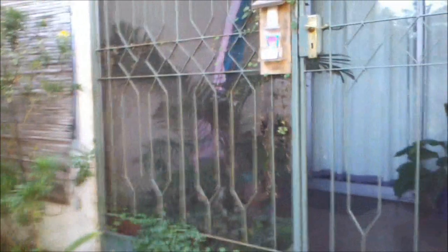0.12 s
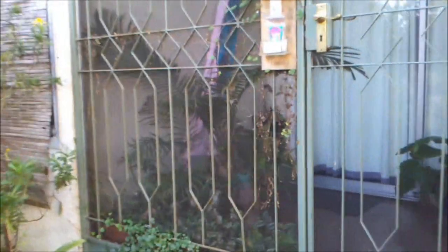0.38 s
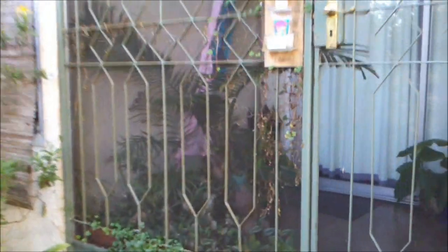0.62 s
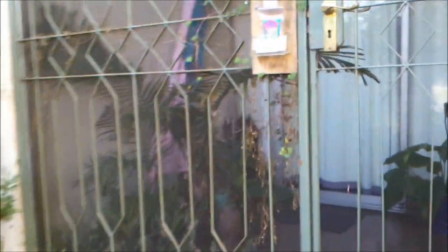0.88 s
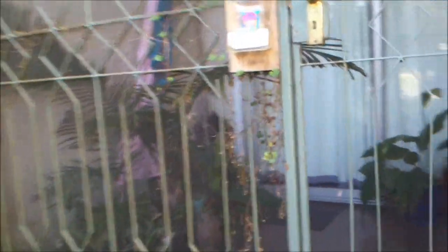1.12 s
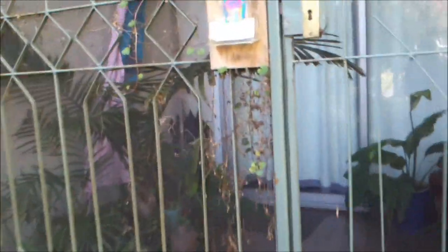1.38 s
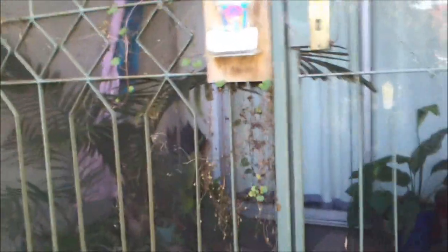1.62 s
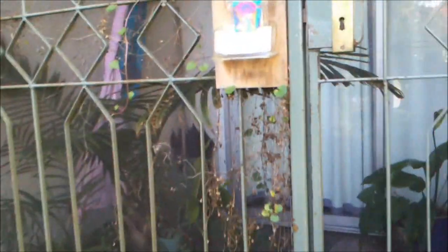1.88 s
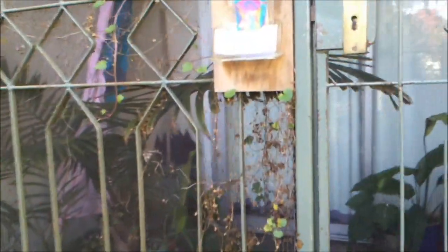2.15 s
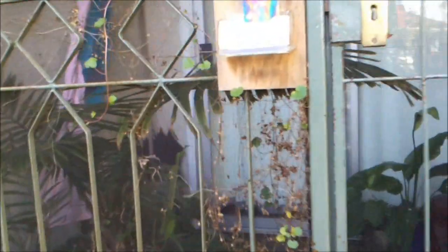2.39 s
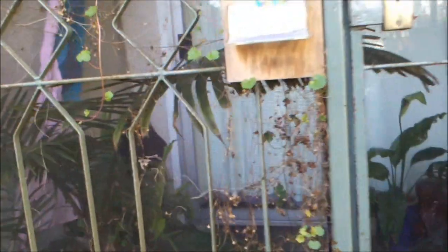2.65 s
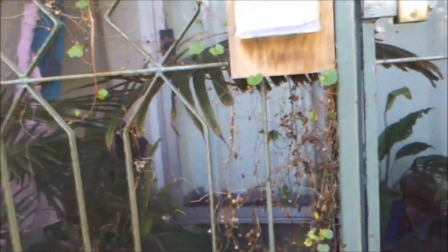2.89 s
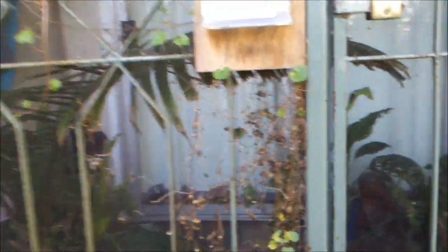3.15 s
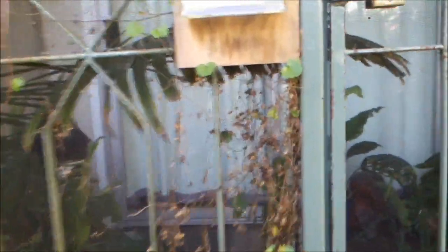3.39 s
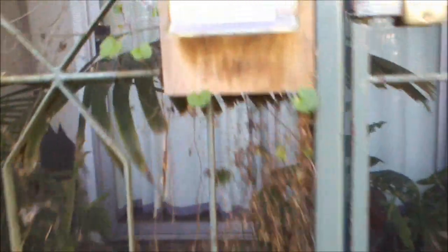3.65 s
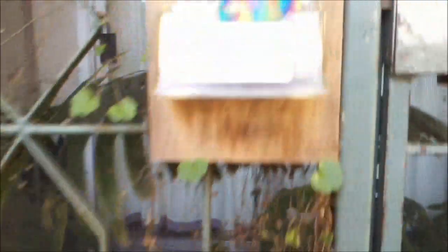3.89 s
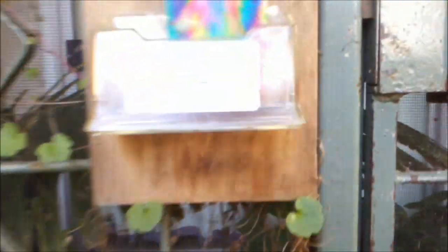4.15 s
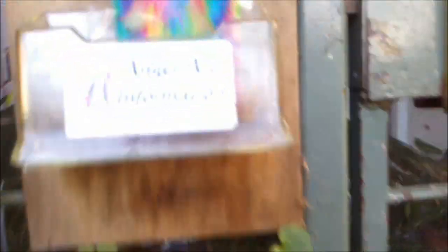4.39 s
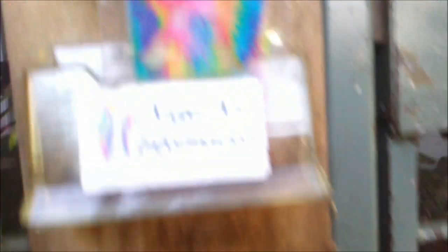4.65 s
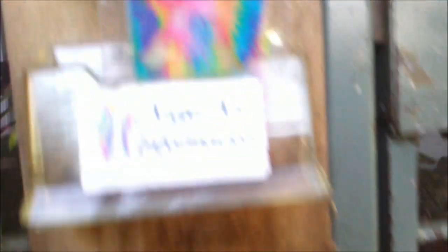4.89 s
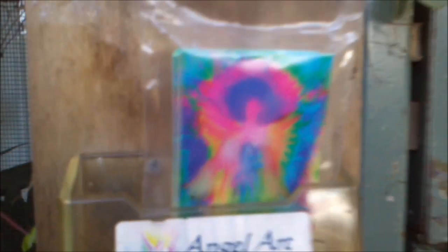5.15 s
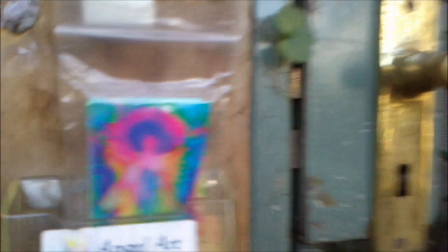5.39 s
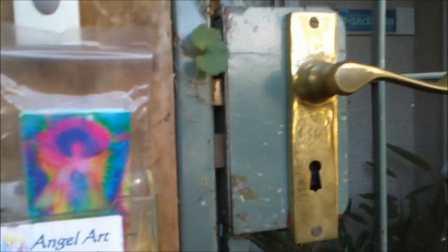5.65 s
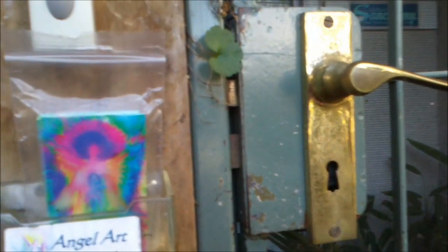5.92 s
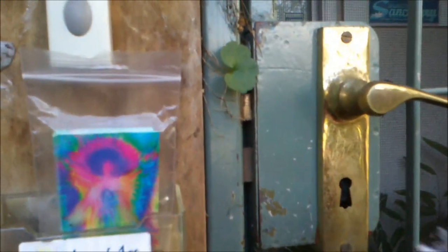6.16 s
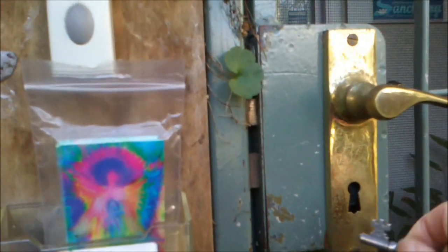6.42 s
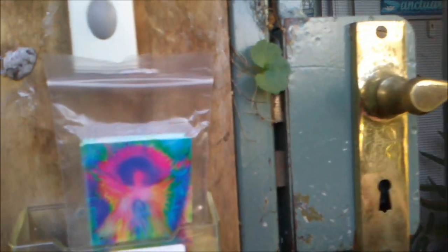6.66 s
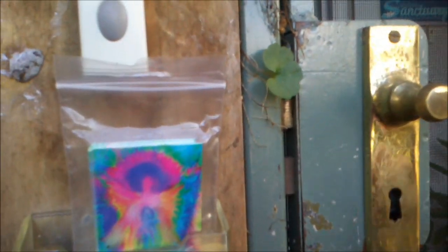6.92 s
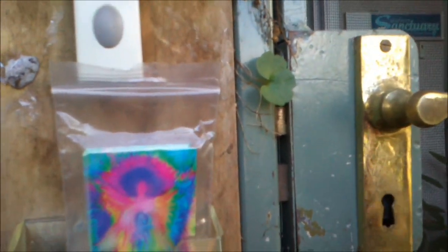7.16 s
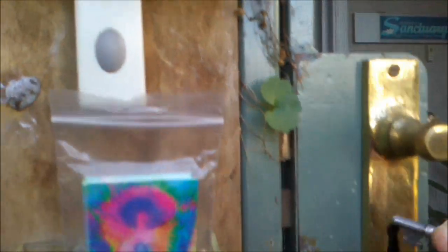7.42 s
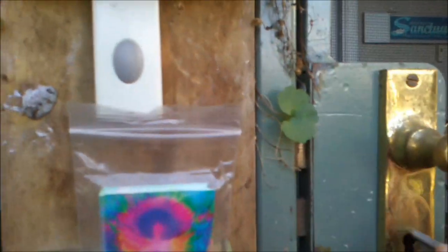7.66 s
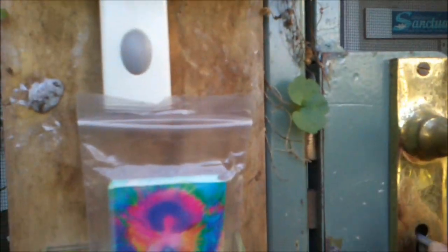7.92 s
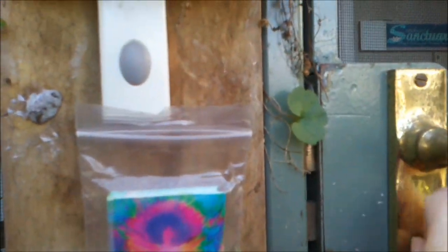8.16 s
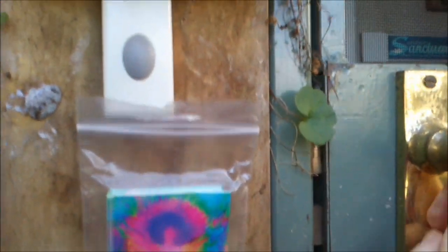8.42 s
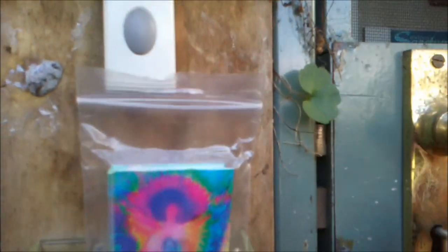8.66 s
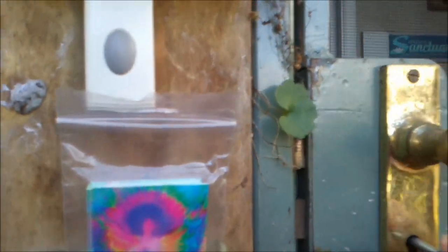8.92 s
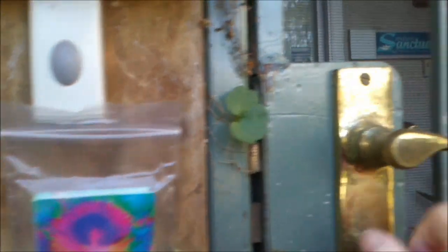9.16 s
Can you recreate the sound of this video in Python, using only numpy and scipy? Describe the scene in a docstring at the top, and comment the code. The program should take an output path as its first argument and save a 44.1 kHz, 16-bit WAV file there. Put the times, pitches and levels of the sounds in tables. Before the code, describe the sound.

Close, sharp metallic key jingles come in uneven bursts, thin out to small clicks, then a key knocks into a hollow lock, quiet street behind.

```python
"""Distant traffic hums from the start: filtered noise whose bands swell, under a sinusoidal engine note.
A bunch of keys swings and jangles in a hand walking up to a metal gate: chance impacts excite damped modes.
A far horn of steady partials sounds once, then a faint tone slides up, wavering, over a low hum.
At last the keys clink and turn in the lock, whose hollow case adds resonant noise until the key sits home.
Throughout, nearby walls return sparse echoes, and the loudest jangles overload a small recorder."""
import sys
import numpy as np
from scipy import signal
from scipy.fft import rfft, irfft, next_fast_len
from scipy.io import wavfile
from scipy.ndimage import uniform_filter1d

SR = 44100
rng = np.random.default_rng(int(sys.argv[2]) if len(sys.argv) > 2 else 0)


def level_to_linear(level):
    """Convert decibel levels to linear amplitude factors, elementwise."""
    exponent = np.asarray(level, float) / 20
    return 10 ** exponent


def waveform_to_disk(signal):
    """Save audio, clipped to [-1, 1], as 16-bit WAV at the path in sys.argv[1]."""
    frames = np.transpose(np.atleast_2d(signal))
    scaled = np.clip(frames, -1, 1) * 32767
    samples = np.round(scaled).astype(np.int16)
    wavfile.write(sys.argv[1], SR, samples)


N = 410130

# Street noise, spectral shape: f/Hz, relative density/dB per Hz
TRAFFIC_SPECTRUM = [(12, -36.5), (22, 0), (36, 4), (50, -7), (70, 2.5), (110, -1.5), (170, -10.5),
                    (320, -15.5), (968, -18.5), (2380, -27), (5110, -31.5), (8890, -26), (11000, -41),
                    (14300, -73)]
# Tyre roar as cars pass: t/s, mid-band gain/dB
ROAR_GAIN = [(0, 4), (2, 3), (4.9, 5.5), (6.2, 3.5), (7.4, 2.5), (8.68, 9.5), (9.3, 6)]
# An engine in the street: t/s, mean f/Hz, rms level of the fundamental/dB
ENGINE_TRACK = [(1.2, 69.2, -49), (2, 71.8, -48), (3.7, 72.9, -45), (5.3, 70.4, -60.5), (7.2, 70, -56),
                (8.3, 84, -71), (8.78, 92.4, -66), (8.85, 93.2, -43), (9.3, 101.2, -51)]
# Steady far tones, a horn and a hum: start t/s, end t/s, f/Hz, rms level/dB
FAR_TONES = [(2.78, 3.05, 460, -45), (2.78, 2.905, 1003, -53), (2.84, 3.05, 812, -51),
             (2.84, 2.9, 1092, -55), (2.93, 3.05, 1077, -44), (2.86, 2.97, 1358, -60),
             (2.85, 2.95, 555, -54), (5.0, 8.185, 250, -58)]
# Faint sliding tone: start t/s, end t/s, from f/Hz, to f/Hz, mean rms level/dB before the taper
FAR_GLIDE = (5.13, 5.4, 700, 830, -60)
# Modes of the keys: f/Hz, relative level/dB, relative decay time t60/s (scaled at each use)
KEY_MODES = [(1541, -19.5, 0.08), (2870, -12.5, 0.062), (2913, -11, 0.084), (3028, -10, 0.11),
             (3410, -17, 0.25), (4080, -15.5, 0.14), (4670, -14, 0.04), (5220, -10.5, 0.099),
             (5596, -12, 0.13), (6610, -13.5, 0.2), (6880, -26, 0.19), (7550, -6.5, 0.07),
             (7695, -19, 0.032), (8040, -7, 0.07), (8530, -8.5, 0.075), (9220, -7, 0.067),
             (9160, -9, 0.0578), (9600, -8, 0.074), (10120, -8, 0.22), (10440, -7.5, 0.088)]
# How freely the keys ring, damped around 5.6 s and 7.4 s, freer near 6.8 s and at the end:
# t/s, ringing gain/dB
KEY_FREEDOM = [(0, -3), (5.4, -1.5), (5.6, -17.5), (6.8, 5), (7.35, -14.5), (7.45, -11.5), (9.3, 2)]
# Jerks of the hand that set the bunch rattling: t/s, relative level/dB, duration kept up/s
HAND_JERKS = [(1.119, -24, 0.045), (1.25, -17, .02), (1.39, -19, 0.074), (1.646, -27.5, 0.056),
              (1.828, -27, 0.0033), (2.129, -39, 0.0044), (2.33, -37.5, 0.068), (2.85, -33.5, 0.028),
              (2.96, -24.5, 0.15), (3.36, -48.5, .01), (3.6, -50, 0.14), (3.79, -29.5, 0.012),
              (3.938, -17, .27), (4.34, -19.5, 0.0091), (4.4, -28.5, 0.29), (4.639, -15.5, 0.037),
              (4.8, -29, 0.067), (5.2, -41, 0.15), (5.6, -47.5, 0.36), (6.9, -48.5, .85),
              (7.98, -39, 0.084), (8.45, -48, 0.33), (9.0, -45, 0.025), (9.2, -39, 0.0056)]
# Noise of a metal contact, spectral shape: f/Hz, relative density/dB per Hz
CRACK_SPECTRUM = [(290, -81.5), (500, -10.5), (2330, -22.5), (3170, -7), (4330, -5), (5060, -8),
                  (6140, -2.5), (9650, 1), (11000, -13), (14300, -22.5), (22000, -120)]
# Resonances of ring and fob: f/Hz, bandwidth/Hz, relative level/dB
BODY_MODES = [(984, 69, -11.5), (1620, 160, 0), (1964, 277, 6.5), (2327, 440, 3)]
# Echoes of the yard: f/Hz, decay time t60/s
YARD_DECAY = [(300, 0.17), (1500, 0.35), (4000, 0.19), (10000, 0.17)]
# Soft bumps of the bunch and hand: t/s, relative level/dB, f/Hz
HAND_THUMPS = [(0.655, -31.5, 467), (1.122, -33.5, 380), (1.21, -23, 490), (1.251, -5.5, 393),
               (1.339, -29.5, 467), (1.384, -12.5, 397), (1.63, -29.5, 420), (1.829, -25, 120),
               (2.122, -36, 218), (2.924, -26, 372), (3.023, -18.5, 345), (3.128, -17, 347),
               (3.784, -12, 352), (4.05, -8, 442), (4.319, -25, 377), (4.404, -24.5, 421),
               (4.579, -20, 240), (4.653, -5, 169), (4.67, -15, 407), (4.712, -17.5, 228),
               (4.778, -29, 471), (4.862, -32.5, 152), (5.079, -35, 250), (8.012, -26.5, 620),
               (8.296, -41, 580)]
# Sharp blows of metal on metal: peak t/s, relative crack level/dB, relative knock level/dB,
# main 60 dB decay time/s (at least 5 ms)
CLINK_BLOWS = [(0.891, -44, -29.5, 0.029), (.947, -34, -46, .027), (1.0317, -30, -31, 0.091),
               (1.078, -23, -22, 0.22), (1.113, -21, -20, .02), (1.124, -35.5, -23, .02),
               (1.191, -26.5, -18, .02), (1.229, -12.5, -30, 0.026), (1.494, -15, -27, .015),
               (1.631, -26.5, -53, 0.22), (1.7616, -24.5, -31, 0.047), (1.8366, -19.5, -45, 0.068),
               (2.218, -36, -36, .01), (2.2278, -28, -32.5, 0.015), (2.3151, -26, -33, 0.052),
               (2.3614, -26.5, -26, 0.18), (2.445, -25.5, -60, 0.043), (2.4863, -29.5, -58, 0.016),
               (2.59, -34.5, -43, 0.043), (2.7294, -37, -58, 0.022), (2.84, -21.5, -36, 0.054),
               (3.182, -17.5, -47, 0.065), (3.266, -28, -60, 0.015), (3.3494, -17.5, -47, 0.017),
               (3.326, -32, -55, 0.011), (3.369, -18, -29, 0.043), (3.535, -39, -59, .008),
               (3.569, -40, -55, .008), (3.5877, -24, -44, 0.0048), (3.5938, -20.5, -44, 0.0077),
               (3.631, -26, -38, 0.0068), (3.6696, -23, -20, 0.036), (3.6782, -23, -55, 0.01),
               (3.73, -28, -44, 0.029), (3.7451, -18.5, -29.5, 0.028), (3.775, -23.5, -41, 0.059),
               (3.852, -30.5, -26, 0.036), (3.8874, -22, -27, 0.17), (3.9244, -4, -15, 0.13),
               (4.038, -14, -7.5, .033), (4.0535, -6, -19.5, 0.026), (4.32, -15, -16, 0.03),
               (4.407, -27.5, -52.5, 0.65), (4.431, -20.5, -20, 0.054), (4.5755, -16.5, -24.5, 0.33),
               (4.615, -7, -17.5, 0.14), (5.0343, -32, -45, 0.091), (5.0655, -39, -36, 0.052),
               (5.084, -29.5, -38, 0.18), (5.261, -32.5, -30.5, 0.23), (5.337, -33, -37, 0.065),
               (5.3525, -32, -29, 0.024), (5.4152, -44, -33, .028), (5.507, -34.5, -43, 0.12),
               (5.5286, -28, -23.5, 0.057), (5.615, -25.5, -24.5, 0.025), (5.6486, -30, -32, 0.2),
               (5.677, -25, -40, .01), (5.6842, -16, -16.5, 0.0099), (5.701, -30.5, -21, 0.0086),
               (5.77, -30.5, -44, 0.067), (5.8463, -16, -14.5, 0.02), (6.0027, -38, -32, .042),
               (6.3248, -31, -24.5, 0.03), (6.4255, -31.5, -24, 0.043), (6.491, -42, -32.5, 0.072),
               (6.858, -34, -36, 0.04), (6.868, -38, -38, .01), (6.8769, -29, -31.5, 0.0045),
               (6.9053, -33, -36, 0.037), (6.92, -30.5, -31.5, .016), (6.961, -56, -38, 0.013),
               (6.9881, -35, -49, .01), (7.018, -23.5, -16.5, 0.038), (7.06, -25, -40, 0.047),
               (7.0904, -28.5, -30, .038), (7.1, -40, -36, 0.012), (7.1474, -32.5, -54, .02),
               (7.179, -25.5, -30, 0.031), (7.2033, -17, -21, 0.056), (7.2763, -56, -31.5, 0.036),
               (7.293, -23, -37.5, 0.035), (7.3254, -20, -27, 0.013), (7.353, -42, -23, .021),
               (7.4828, -10.5, -19, 0.03), (7.58, -33, -28, 0.013), (7.5948, -35.5, -32, 0.091),
               (7.735, -25, -21.5, 0.043), (7.8162, -22, -27, 0.039), (7.947, -22, -41, 0.026),
               (7.9554, -13, -25.5, 0.024), (8.0158, -14.5, -20.5, .067), (8.051, -13, -21, 0.05),
               (7.908, -55, -37, 0.017), (8.153, -28.5, -30, 0.018), (8.3052, 0.5, -8.5, 0.011),
               (8.456, -42, -33.5, 0.022), (8.517, -23.5, -33.5, 0.13), (8.585, -31, -48, 0.022),
               (8.6109, -15, -16, 0.024), (8.636, -27.5, -32, 0.13), (8.726, -37, -46, .013),
               (8.808, -30.5, -29.5, 0.023), (8.852, -35.5, -42, .015), (8.928, -37, -53, 0.026),
               (9.0249, -20.5, -13.5, 0.017), (9.16, -34.5, -38, 0.015), (9.203, -31.5, -25.5, 0.1),
               (9.248, -33, -44, 0.086)]
# Keys tumbling onto each other, a pile of blows that builds up: columns as for CLINK_BLOWS
TUMBLE_BLOWS = [(1.142, -24.5, -16, 0.012), (1.2152, -20.5, -33, .04), (1.2574, -7, -16, 0.097),
                (1.354, -17, -21, 0.1), (1.3812, -12, -26, 0.16), (1.516, -23, -28, 0.032),
                (1.803, -24, -30, 0.096), (1.9473, -35, -34.5, 0.12), (2.1317, -24, -56, .026),
                (2.263, -32.5, -30, 0.093), (2.95, -16.5, -55, 0.068), (3.0278, -11.5, -50, .045),
                (3.1342, -8, -24, 0.067), (3.7912, -11, -32.5, 0.088), (3.985, -29.5, -27, 0.12),
                (4.0986, -10, -40, .028), (4.184, -26.5, -28.5, .08), (4.27, -30.5, -30.5, .035),
                (4.3537, -15.5, -35, 0.049), (4.668, -12.5, -37, 0.067), (4.715, -14, -14, .12),
                (4.88, -27, -31.5, .15), (8.9975, -26, -31, .17)]
# Keys left free to sing after a blow: t/s, level/dB before decay, f/Hz, time until a touch damps it/s
FREE_RINGS = [(1.245, -17.5, 5260, 0.037), (1.246, -14, 2870, 0.023), (1.256, -12.5, 9800, .089),
              (1.273, -19.5, 8470, .036), (1.333, -22, 9780, 0.031), (1.34, -14, 8950, .029),
              (1.375, -14, 3020, 0.035), (1.428, -28, 8930, .037), (1.521, -22, 9810, .096),
              (1.533, -20, 8930, .061), (1.76, -29, 4060, .02), (1.834, -31, 9260, 0.031),
              (1.93, -36.5, 5550, 0.023), (2.127, -39, 5500, 0.024), (2.36, -27, 8150, 0.088),
              (2.443, -42, 4060, 0.024), (2.486, -33, 4100, 0.012), (2.443, -27, 2990, 0.0074),
              (2.841, -21, 5580, 0.012), (2.86, -32, 8200, .042), (2.944, -27, 6610, .06),
              (2.943, -24, 10400, 0.074), (2.949, -20.5, 3020, 0.014), (3.026, -16, 6590, 0.031),
              (3.024, -11, 10440, .061), (3.085, -17, 8480, .036), (3.264, -28, 5590, 0.01),
              (3.783, -15.5, 8490, 0.034), (3.929, -12, 10130, 0.037), (3.933, 0, 8190, 0.06),
              (3.937, -9.5, 1520, .033), (3.992, -17.5, 5660, 0.052), (4.051, -8.5, 3080, 0.0059),
              (4.068, -9.5, 10390, 0.02), (4.081, -14, 3060, 0.036), (4.087, -17.5, 5220, .03),
              (4.094, -7, 8910, .075), (4.117, -7.5, 7640, .042), (4.138, -17, 5240, .025),
              (4.161, -14, 10440, .047), (4.183, -17, 5210, 0.018), (4.225, -20.5, 6620, 0.055),
              (4.223, -8, 10470, .104), (4.232, -26.5, 3420, 0.072), (4.317, -14.5, 9830, 0.087),
              (4.322, -9.5, 8910, .046), (4.347, -15, 5210, 0.03), (4.406, -7.5, 7660, 0.028),
              (4.428, -18.5, 9330, .08), (4.428, -15.5, 3060, 0.16), (4.53, -28.5, 1516, .08),
              (4.571, -20.5, 8190, .033), (4.577, -29, 5610, .03), (4.577, -16, 9330, 0.022),
              (4.649, -23, 4080, 0.048), (4.651, -13.5, 3370, 0.012), (4.662, -23, 5610, .039),
              (4.726, -16.5, 8200, 0.091), (4.872, -29, 8500, 0.048), (5.08, -29.5, 4080, 0.046),
              (5.205, -31, 8510, 0.022), (5.335, -27.5, 8230, 0.075), (5.339, -30.5, 2860, 0.023),
              (5.336, -35.5, 1544, .03), (5.77, -40, 1470, 0.013), (5.842, -23.5, 8200, 0.099),
              (6.917, -37, 2980, 0.013), (6.918, -44, 5300, 0.049), (7.059, -28, 5300, .012),
              (7.059, -25.5, 7140, 0.015), (7.202, -36, 2970, 0.037), (7.217, -25, 8480, .015),
              (5.89, -39, 5300, .012), (5.89, -48, 3060, .015), (5.89, -43, 7550, .02),
              (6.93, -51, 6400, 0.039), (7.06, -34, 10340, .03), (7.147, -41, 9650, .025),
              (7.175, -23, 7600, 0.0071), (7.18, -41, 5300, 0.024), (7.293, -34, 10300, 0.022),
              (9.076, -46, 5270, 0.029), (9.251, -44, 5640, 0.042), (1.293, -26, 5220, 0.045),
              (1.644, -32, 5260, .06), (1.837, -28, 6600, 0.024), (3.126, -25, 5200, 0.027),
              (2.842, -29, 4000, .011), (4.201, -27, 5640, .057), (4.217, -23, 8300, .049),
              (3.987, -25, 7540, .038), (4.079, -27, 4680, .05), (3.97, -26, 3440, .03),
              (8.043, -24, 1490, .012), (8.991, -27, 3080, 0.0046)]

TRAFFIC_DB = -48  # rms of the wash before its bands swell
RUMBLE_DB, RUMBLE_FOLLOWS = -57, 0.24  # engine dB that leaves the rumble unchanged, dB per dB
TOUCHES_PER_S = 500
JERK_RISE_DB_PER_S, SETTLE_DB_PER_S, AT_REST_DB = 247.5, 163.5, -60.5
CLINK_RISE_S, TUMBLE_RISE_S = 0.0017, 0.023
LOCK_HZ, LOCK_WIDTH_HZ = 730, 250
IN_LOCK_S, KEY_SEATED_S = 8.2, 8.8  # the hollow lock case sounds between these times
EDGE_HZ = 11060


def evened(x):
    """Normalisation: scales a signal to an rms of 1."""
    return x / np.sqrt(np.mean(x ** 2) + 1e-20)


def read(points, hz):
    """Spectral interpolation: reads a table at hz, on a logarithmic frequency axis."""
    f, value = np.transpose(points)
    return np.interp(np.log(hz + 1), np.log(f + 1), value)


def add(mix, s, sound):
    """Superposition: sums a sound into the mix at time s."""
    part = mix[round(s * SR):][:len(sound)]
    part += sound[:len(part)]


def coloured(x, points):
    """Linear filtering: multiplies the spectrum of x by a table."""
    size = next_fast_len(len(x))
    gain = level_to_linear(read(points, np.fft.rfftfreq(size, 1 / SR)))
    return irfft(rfft(x, size) * gain, size)[:len(x)]


def mode(x, hz, width):
    """Damped resonance: two poles, where a unit click rings at height 1."""
    r, w = np.exp(-np.pi * width / SR), 2 * np.pi * hz / SR
    return signal.lfilter([0, np.sin(w)], [1, -2 * r * np.cos(w), r * r], x)


def curve(rows):
    """Linear interpolation in time: the columns of a table at every sample."""
    s, *columns = np.transpose(rows)
    return [np.interp(np.arange(N) / SR, s, c) for c in columns]


def traffic(engine_db):
    """Broadband noise: a wash whose rumble follows the engine and whose middle swells with tyre roar."""
    wash = level_to_linear(TRAFFIC_DB) * evened(coloured(rng.standard_normal(N), TRAFFIC_SPECTRUM))
    low = signal.sosfilt(signal.butter(2, 160, fs=SR, output="sos"), wash)
    top = signal.sosfilt(signal.butter(2, 2500, "high", fs=SR, output="sos"), wash)
    rumble = low * level_to_linear(RUMBLE_FOLLOWS * (engine_db - RUMBLE_DB))
    roar = (wash - low - top) * level_to_linear(curve(ROAR_GAIN)[0])
    return top + rumble + roar


def engine(hz, db):
    """Harmonic series: a slightly unsteady fundamental and its octave, phase being integrated frequency."""
    unsteady = 1 + 0.018 * evened(uniform_filter1d(rng.standard_normal(N), 4000))
    phase = 2 * np.pi * np.cumsum(hz * unsteady) / SR
    return np.sqrt(2) * level_to_linear(db) * (np.sin(phase) + level_to_linear(-12.0) * np.sin(2 * phase))


def far_tones():
    """Simple harmonic motion: steady sinusoids, tapered at both ends, form the horn and hum."""
    out = np.zeros(N)
    for start, end, hz, db in FAR_TONES:
        t = np.arange(round((end - start) * SR)) / SR
        taper = signal.windows.tukey(len(t), .25)
        add(out, start, np.sqrt(2) * level_to_linear(db) * taper * np.sin(2 * np.pi * hz * t))
    return out


def far_glide():
    """Frequency modulation: a faint tone slides up while its pitch and level waver."""
    out = np.zeros(N)
    start, end, from_hz, to_hz, db = FAR_GLIDE
    u = np.linspace(0, 1, round((end - start) * SR))
    waver = evened(uniform_filter1d(rng.standard_normal(len(u)), 900))
    hz = from_hz + (to_hz - from_hz) * np.sin(np.pi / 2 * u) + 14 * waver
    level = np.sqrt(2) * level_to_linear(db + 2 * waver[::-1]) * signal.windows.tukey(len(u), .4)
    add(out, start, level * np.sin(2 * np.pi * np.cumsum(hz) / SR))
    return out


def street():
    """Superposition of far sources: traffic, engine, steady tones and glide."""
    hz, db = curve(ENGINE_TRACK)
    return traffic(db) + engine(hz, db) + far_tones() + far_glide()


def touches(level, per_s, sustain):
    """Random impacts: touches of uneven size give bare ticks and ring the keys, each its own mix."""
    at = np.flatnonzero(rng.random(N) < per_s / SR)
    size = level_to_linear(4.0 * np.minimum(rng.exponential(1, len(at)), 4))
    size *= level[at] / np.sqrt(np.mean(size ** 2) * per_s)
    keys, train = np.zeros(N), np.zeros(N)
    for hz, db, t60 in KEY_MODES:
        train[at] = size * rng.standard_normal(len(at)) ** 3
        keys += level_to_linear(db) * mode(train, hz, 2.47 / (sustain * t60))
    train[at] = size
    decay = signal.lfilter([1], [1, -np.exp(-1 / (0.00072 * SR))], train)  # time constant 0.72 ms
    return coloured(rng.standard_normal(N) * decay, CRACK_SPECTRUM), keys


def shaking():
    """Addition of powers: every jerk builds fast, is kept up a while and settles at one rate."""
    t, power = np.arange(0, N + 64, 64) / SR, level_to_linear(2 * AT_REST_DB)
    for s, db, kept in HAND_JERKS:
        rise_lack = JERK_RISE_DB_PER_S * np.maximum(s - t, 0)
        settle_lack = SETTLE_DB_PER_S * np.maximum(t - s - kept, 0)
        power = power + level_to_linear(2 * (db - rise_lack - settle_lack))
    return np.interp(np.arange(N) / SR, t, np.sqrt(power))


def rattle():
    """Impact and friction excitation: small touches and knocks in the shaken bunch, and the hand rubbing it."""
    shake = shaking()
    ticks, keys = touches(shake, TOUCHES_PER_S, 0.63)
    noise = rng.standard_normal(N)
    # keys sliding sound their own modes
    singing = evened(sum(level_to_linear(db) * mode(noise, hz, 64) for hz, db, t60 in KEY_MODES))
    scrape = level_to_linear(-12.5) * evened(coloured(noise, CRACK_SPECTRUM)) + level_to_linear(-11) * singing
    rub = evened(mode(mode(rng.standard_normal(N), 391, 169), 391, 169))
    taps = (rng.random(N) < 60 / SR) * rng.standard_normal(N)  # 60 per second on average
    knocks = evened(sum(level_to_linear(db) * mode(taps * rng.random(N), hz, w) for hz, w, db in BODY_MODES))
    hand = level_to_linear(-16) * rub + level_to_linear(-16.5) * knocks + lock_case(level_to_linear(3))
    ringing = level_to_linear(11.5) * level_to_linear(curve(KEY_FREEDOM)[0]) * keys
    return ringing + level_to_linear(32.0) * ticks + shake * (scrape + hand)


def yard(x):
    """Reverberation: walls nearby return sparse echoes, each band dying at its own speed."""
    taps = np.zeros(SR // 2)
    at = np.arange(200, len(taps) - 20, 20)
    taps[at + rng.integers(0, 20, len(at))] = rng.choice([-1., 1.], len(at))
    hz, t, z = signal.stft(taps, SR, nperseg=256)
    decay = level_to_linear(-60 * t / read(YARD_DECAY, hz)[:, None])
    tail = signal.istft(z * decay, SR, nperseg=256)[1]
    return signal.oaconvolve(x, tail / np.linalg.norm(tail))[:N]


def thumps():
    """Damped oscillation: a soft hollow bump with a puff of noise, and a slow push of the hand under it."""
    out, t = np.zeros(N), np.arange(6000) / SR
    envelope = level_to_linear(-60 * t / 0.071) * np.minimum(t / 0.0061, 1)
    push = level_to_linear(-15.5) * np.sin(2 * np.pi * 60 * t) * level_to_linear(-60 * t / 0.1)
    for (s, db, hz), noise in zip(HAND_THUMPS, rng.standard_normal((len(HAND_THUMPS), len(t)))):
        puff = evened(mode(mode(noise, hz * 1.11, hz * 1.25), hz * 1.28, hz * 1.3))
        bump = np.sin(2 * np.pi * hz * t) + 0.74 * puff
        add(out, s - .003, level_to_linear(db) * (envelope * bump + push))
    return out


def clinks():
    """Impact excitation: each blow or pile-up is a gritty crack, a knock of ring and fob, and keys ringing."""
    out, t = np.zeros(N), np.arange(-2000, 6000) / SR
    grit, jangle = (evened(v) for v in touches(np.ones(N), 1500, 0.19))
    hiss = evened(coloured(rng.standard_normal(N), CRACK_SPECTRUM))
    knock = evened(sum(level_to_linear(db) * mode(rng.standard_normal(N), hz, w) for hz, w, db in BODY_MODES))
    # small parts give no bass
    knock = signal.sosfilt(signal.butter(4, 850, "high", fs=SR, output="sos"), knock)
    knock += lock_case(level_to_linear(-12.0))
    free = level_to_linear(curve(KEY_FREEDOM)[0])
    crack = level_to_linear(-13) * hiss + level_to_linear(-7.5) * grit + level_to_linear(-3) * free * jangle
    fade = signal.windows.tukey(len(t), .2)
    hz, key_db, t60 = np.transpose(KEY_MODES)[:, :, None]
    blows = [(*row, CLINK_RISE_S) for row in CLINK_BLOWS]
    blows += [(*row, TUMBLE_RISE_S) for row in TUMBLE_BLOWS]
    chances = rng.random((len(blows), 2, len(KEY_MODES), 1))
    for (s, db, body_db, fall, rise), (weakness, phase) in zip(blows, chances):
        at = np.minimum(round(s * SR) + np.arange(-2000, 6000), N - 1)
        build = np.maximum(1 + t / rise, 0)
        blow = np.where(t < 0, build, level_to_linear(-60 * abs(t) / max(fall, .005)))
        blow += level_to_linear(-25 - 60 * abs(t) / 0.18) * (t > 0)  # the parts shiver on after the blow
        lead = min(rise, .002)
        blow += level_to_linear(-5.0 - 60 * abs(t + lead) / 0.011) * (t > -lead)  # hard first contact
        key_level = level_to_linear(key_db - 42 * weakness - 60 * abs(t) / (0.084 * t60))  # chance favours a few keys
        keys = key_level * np.sin(2 * np.pi * (hz * t + phase))
        ringing = level_to_linear(db - 8.0) * np.sqrt(free[at]) * (t > 0) * keys.sum(0)
        struck = level_to_linear(db + 1.0) * crack[at] + level_to_linear(body_db - 6.5) * knock[at]
        add(out, s + t[0], fade * blow * struck + ringing)
    return out


def contacts():
    """Impulse response: the first touch of each sharp blow is a bare tick and one tap into ring and fob."""
    s, db, body_db, fall = np.transpose(CLINK_BLOWS)
    at = np.round((s - CLINK_RISE_S / 2) * SR).astype(int)
    side = rng.choice([-1., 1.], len(CLINK_BLOWS))
    tick, tap = np.zeros((2, N))
    tick[at], tap[at] = side * level_to_linear(db + 14), side * level_to_linear(body_db - 7.5)
    body = sum((-1) ** k * level_to_linear(db) * mode(tap, hz, w) for k, (hz, w, db) in enumerate(BODY_MODES))
    return coloured(tick, CRACK_SPECTRUM) + body


def rings():
    """Free vibration and damping: single key modes sing clear until a finger or another key stops them."""
    out, hz_of = np.zeros(N), np.transpose(KEY_MODES)[0]
    for (s, db, hz, held), phase in zip(FREE_RINGS, rng.random((len(FREE_RINGS), 1))):
        t = np.arange(round((held + .06) * SR)) / SR
        t60 = 2.7 * KEY_MODES[np.argmin(abs(hz_of - hz))][2]  # from the nearest mode
        fall_db = 60 * (t / t60 + np.maximum(t - held, 0) / 0.02)
        rise = np.minimum(t / 0.0014, 1)
        add(out, s, level_to_linear(db - fall_db) * rise * np.sin(2 * np.pi * (hz * t + phase)))
    return out


def lock_case(level):
    """Cavity resonance: noise in the hollow of the lock while the key slides in."""
    t = np.arange(N) / SR
    hollow = evened(mode(rng.standard_normal(N), LOCK_HZ, LOCK_WIDTH_HZ))
    return level * hollow * (t > IN_LOCK_S) * (t < KEY_SEATED_S)


def scene():
    """Superposition: keys close by with a little of the yard, over the street."""
    keys = rattle() + thumps() + clinks() + contacts() + rings()
    return (street() + keys + level_to_linear(-12.0) * yard(keys))[None]


def roll_off(x):
    """The treble ends steeply here."""
    return signal.sosfilt(signal.butter(12, 11130, fs=SR, output="sos"), x)


def record(dry):
    """Band limiting and clipping: a low-pass filter, then overload at full scale."""
    low_pass = signal.firwin(401, EDGE_HZ, window=("kaiser", 8), fs=SR)
    limited = signal.oaconvolve(dry, low_pass[None], "same")
    return roll_off(np.clip(limited, -1, 1))


dry = scene()
out = record(dry)
waveform_to_disk(out)
```